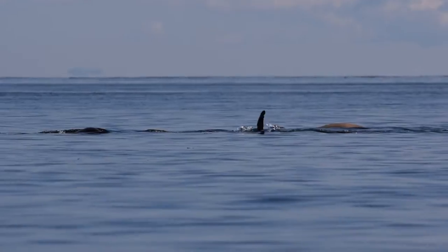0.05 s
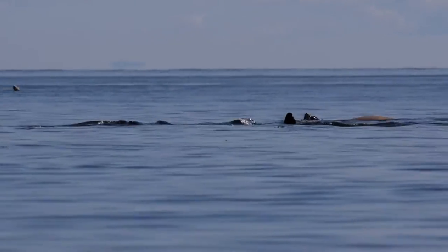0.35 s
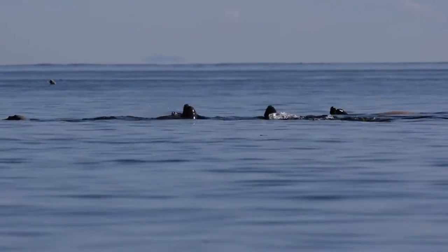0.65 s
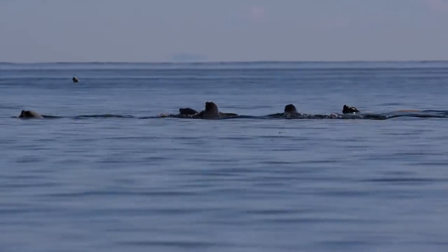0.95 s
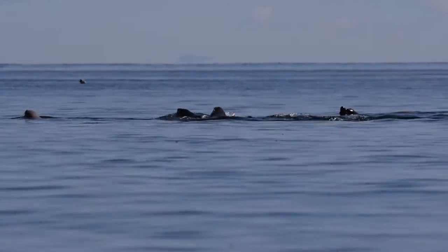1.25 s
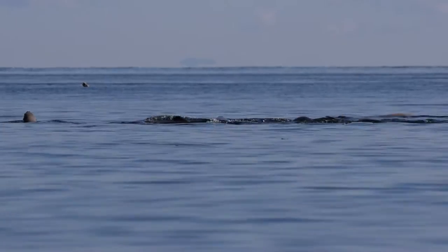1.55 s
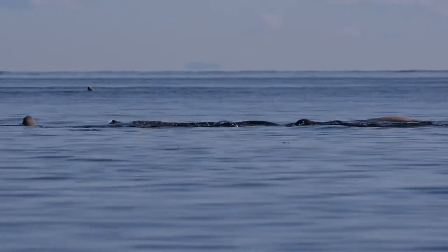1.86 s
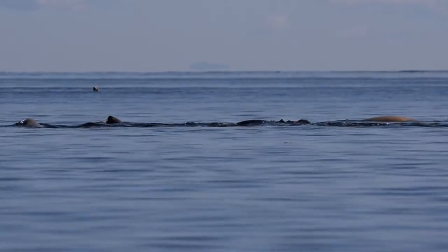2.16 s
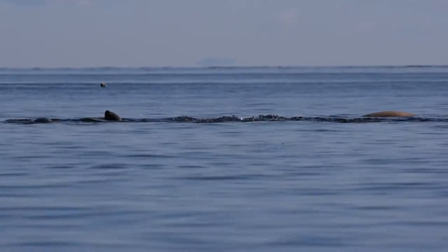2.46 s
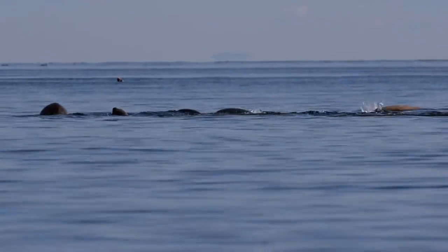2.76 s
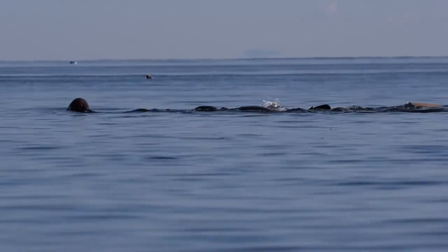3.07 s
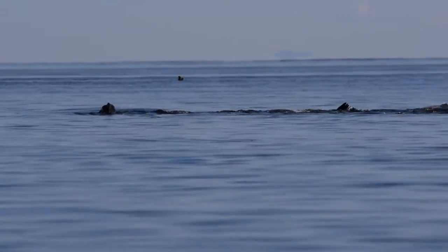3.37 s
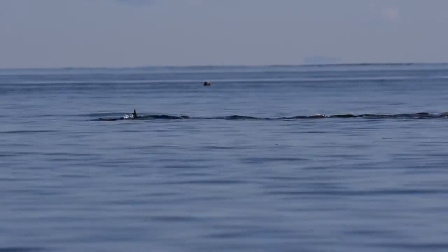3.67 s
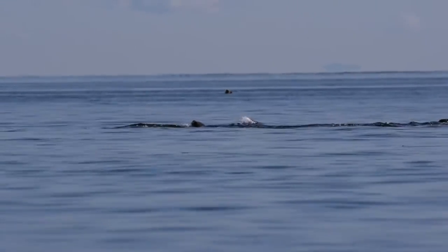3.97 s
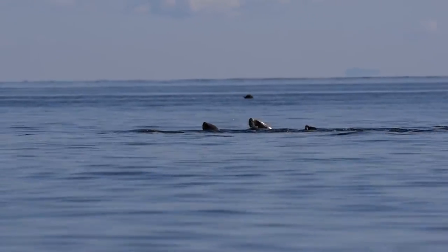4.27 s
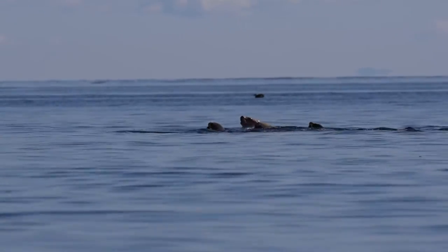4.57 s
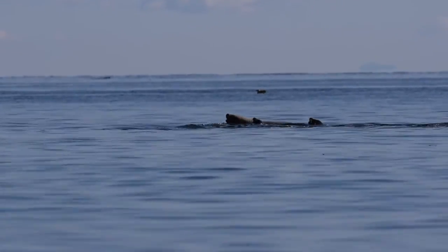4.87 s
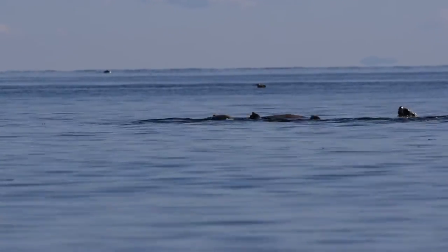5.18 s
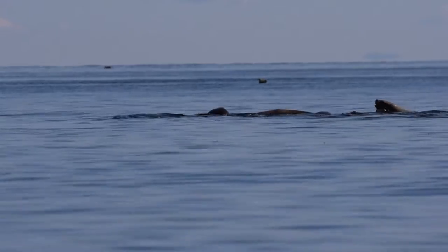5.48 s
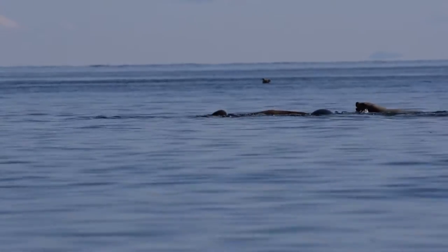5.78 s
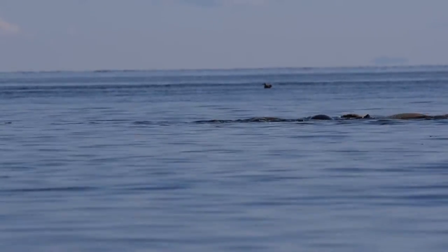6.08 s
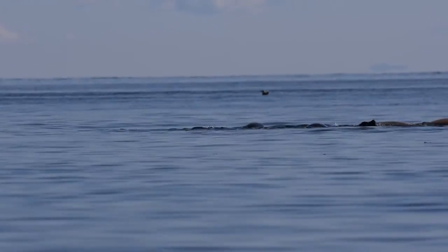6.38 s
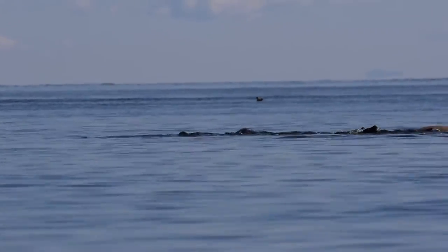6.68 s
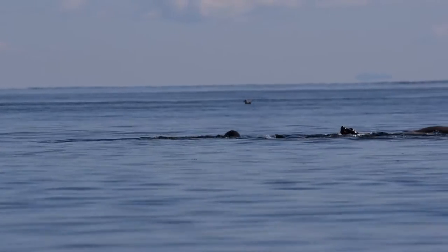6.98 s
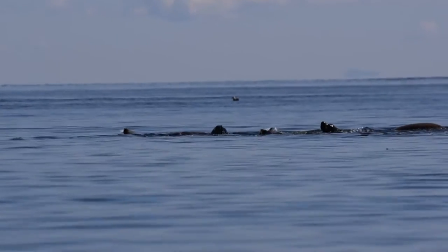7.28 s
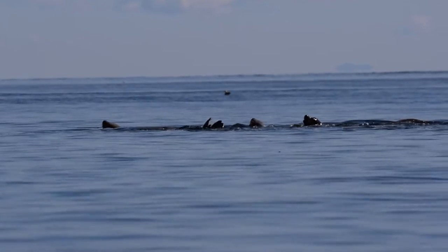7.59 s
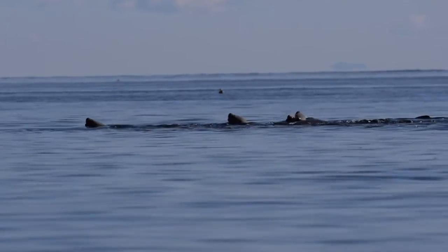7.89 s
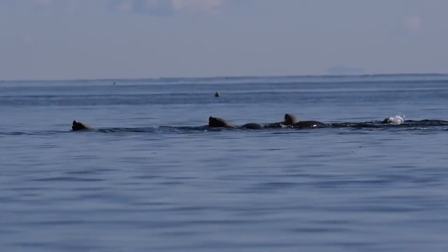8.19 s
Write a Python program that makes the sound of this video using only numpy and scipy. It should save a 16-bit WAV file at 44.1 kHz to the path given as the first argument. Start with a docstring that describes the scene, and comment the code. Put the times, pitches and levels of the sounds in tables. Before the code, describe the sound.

Calm sea water gurgles, drips and fizzes around a boat as two small waves pass, with soft wind underneath.

```python
"""A small wave washes past a boat on a calm sea, where sea lions surface and roll.
Its rush is countless ringing air bubbles (big ones low, small ones high) and a fizz of fine spray.
The water laps, plops and drips until a second wave passes on the right, about six seconds in.
A light breeze and a very faint motor hum lie underneath. The water's gurgle and wash sound centred,
while the spray and the breeze's deep rumble sound wider."""
import sys
import numpy as np
from scipy import signal
from scipy.fft import rfft, irfft, next_fast_len
from scipy.io import wavfile
from scipy.ndimage import uniform_filter1d, map_coordinates

SR = 44100
rng = np.random.default_rng(int(sys.argv[2]) if len(sys.argv) > 2 else 0)


def unload_audio(sound):
    """Save the sound as a 16-bit wav file, at the path given as the first command line argument."""
    columns = np.transpose(np.atleast_2d(sound))
    # keep every value between -1 and 1, then stretch to whole-number steps
    steps = np.round(np.clip(columns, -1, 1) * 32767)
    wavfile.write(sys.argv[1], SR, steps.astype(np.int16))


N = 363384

# The tone colour of the breeze. Each row: frequency in Hz, relative level in dB.
AIR_SPECTRUM = [(15, -7), (35, -3.5), (60, -6), (110, -6), (170, -2), (270, -0.5), (370, -1.5), (600, 7),
                (2000, -23), (9000, -18.5), (15500, -28.5)]
# How wide it sounds. Each row: frequency in Hz, width in dB (very negative means both sides alike).
AIR_WIDTH = [(25, -2), (60, -3), (125, -11), (300, -20.5), (1200, -20), (2500, 0), (4500, 0), (12000, -3)]
# The motor's main tone. Each row: time in seconds, pitch in Hz, level in dB.
MOTOR_TONE = [(0, 77, -75.5), (2.3, 76, -75.5), (3.3, 78.8, -77), (4.25, 85.5, -75), (5.4, 88, -71.5),
              (6.9, 86.4, -77), (8.24, 89.4, -72.5)]
# Its steady higher tones. Each row: pitch in Hz, level in dB.
MOTOR_OVERTONES = [(125, -78), (189, -76), (285, -78)]

# Clear drops close by. Each row: start in seconds, peak in dB, pitch in Hz, fading time in cycles.
NEAR_DROPS = [(0.0118, -33, 7200, 1.5), (0.0309, -23.5, 2230, 1.6), (0.1033, -41, 5570, 3),
              (0.2375, -33, 4020, 1.9), (0.246, -25.5, 1020, 1.4), (0.3477, -27, 2530, 3.9),
              (0.4612, -27, 1480, 1.8), (0.4774, -33, 4600, 1.4), (0.524, -34, 710, 3),
              (0.528, -43, 6150, 2.5), (0.6106, -41, 6080, 2.5), (0.657, -32, 2340, 2.3),
              (0.801, -36, 2450, 2.5), (0.8684, -36, 8800, 1), (0.886, -34, 2350, 2.7),
              (1.3802, -38, 870, 1.3), (1.495, -39, 2410, 3), (1.6205, -49, 6740, 2.5),
              (1.693, -36, 1020, 2.2), (1.7595, -37, 2330, 3), (1.7685, -33.5, 3680, 4.2),
              (1.785, -39.5, 690, 3.5), (1.834, -40.5, 4130, 4), (1.9173, -35.5, 2500, 4.1),
              (2.032, -36, 2420, 2.7), (2.0894, -40, 5370, 3), (2.114, -37, 3700, 3),
              (2.1145, -33, 2380, 2), (2.1214, -31, 8500, 1), (2.2666, -32, 1510, 2),
              (2.2753, -35, 1450, 2), (2.315, -44, 2890, 17), (2.367, -37, 2400, 2),
              (2.4664, -33, 1500, 1.2), (2.4662, -28, 3030, 3.2), (2.4664, -36, 5200, 4),
              (2.4672, -28.5, 3760, 2.8), (2.5665, -43, 4200, 3), (2.624, -44, 8630, 4),
              (2.689, -39, 4560, 2.3), (2.808, -48, 3600, 7.3), (2.848, -50, 2950, 9),
              (2.8805, -47, 5860, 3), (3.0487, -51, 6480, 2.5), (3.3265, -44, 2550, 2.5),
              (3.3603, -48, 6470, 3), (3.4896, -29, 1430, 2.3), (3.501, -40, 1400, 1.9),
              (3.615, -40, 1420, 2.5), (3.7596, -33.5, 1800, 2), (3.774, -36.5, 1485, 2.5),
              (3.9752, -44, 4250, 5.6), (4.068, -37, 1170, 1.6), (4.0942, -31, 1190, 4.1),
              (4.1245, -40, 1345, 3), (4.2365, -42, 2990, 3.5), (4.262, -41, 2920, 4),
              (4.493, -34, 1450, 2.6), (4.669, -45, 7290, 2), (4.711, -31, 1270, 2),
              (4.8168, -33, 1380, 4.5), (4.8447, -28.5, 1730, 2.4), (4.8698, -29, 1400, 2.7),
              (4.9815, -46, 8250, 2), (5.0445, -35.5, 1510, 2.6), (5.0563, -31, 1270, 3.3),
              (5.0671, -37, 8800, 1), (5.103, -36.5, 1460, 3.7), (5.293, -42, 5740, 2),
              (5.528, -39, 3100, 3.7), (5.608, -37, 6490, 2), (5.682, -28.5, 2000, 2.4),
              (5.715, -35, 5890, 2), (5.811, -32, 2390, 2.1), (5.9026, -33, 4480, 2.5),
              (5.9126, -38, 6700, 2.2), (6.028, -33, 1000, 2.5), (6.085, -25, 1590, 2.6),
              (6.114, -34, 9900, 3), (6.165, -35, 7550, 2), (6.236, -28, 1400, 1.8),
              (6.26, -27.5, 1240, 1.6), (6.286, -29, 1300, 1.8), (6.3248, -32, 1250, 2.1),
              (6.3084, -34, 4430, 3), (6.338, -24, 2120, 5.1), (6.353, -32, 4600, 2.5),
              (6.5283, -29.5, 3970, 2), (6.631, -29, 1180, 2.3), (6.723, -25, 9700, 4.2),
              (6.7226, -26, 7000, 2.3), (6.752, -28, 2410, 2), (6.7625, -27, 1420, 2.4),
              (6.7738, -33, 8980, 1.6), (6.8008, -30, 3200, 3.1), (6.882, -29.5, 1224, 6.6),
              (7.0621, -32, 2760, 2.5), (7.2445, -31.5, 2450, 2.9), (7.2964, -40, 5800, 2),
              (7.433, -36, 4030, 2), (7.4538, -43, 5970, 2), (7.6804, -38.5, 4260, 4),
              (7.726, -35, 2650, 5.7), (7.963, -35, 2850, 2.3), (7.9893, -38.5, 3300, 4.4),
              (8, -37, 1020, 2.8), (8.02, -36.5, 1410, 2.5), (8.1644, -37, 1410, 2.3),
              (8.168, -37.5, 1030, 3.3), (8.1805, -35.5, 3080, 2.8), (8.1823, -39.5, 4250, 2.5)]
# Droplets falling back after a splash. Each row: middle in seconds, half-length in seconds, level in dB.
SHOWERS = [(.11, .025, -50.5), (.225, 0.021, -51), (2.04, 0.018, -53.5), (2.108, 0.017, -52),
           (5.92, 0.017, -48), (5.995, 0.015, -49), (6.365, 0.027, -46.5), (6.548, 0.023, -49),
           (6.656, 0.011, -51), (6.765, 0.028, -52), (7.432, 0.02, -54)]
# Spray slapped up in short spurts. Each row: middle in seconds, half-length in seconds, level in dB.
SPURTS = [(0.016, 0.015, -53), (0.1, .0015, -58), (0.146, .003, -50), (0.224, 0.002, -50),
          (0.659, 0.0015, -41), (2.1215, 0.0013, -38), (5.066, 0.002, -53), (5.91, 0.013, -50),
          (6.348, 0.024, -48), (6.724, 0.001, -40), (6.738, .002, -48), (6.774, 0.0012, -45),
          (6.805, 0.007, -52), (7.436, 0.0015, -48)]
# The tone colours of showers and spray. Each row: frequency in Hz, relative level in dB.
SHOWER_SPECTRUM = [(3100, -19), (3900, 5), (5800, -5), (8000, -4)]
SPRAY_SPECTRUM = [(1200, -16), (2300, 5), (3200, 2.5), (4100, 1.5), (5200, -0.5), (6300, -1.5), (7200, -4),
                  (8800, -4.5), (9900, -6.5), (11500, -9.5), (15500, -23)]
# How wide both sound. Each row: frequency in Hz, width in dB.
SPRAY_WIDTH = [(2000, -42), (2800, -18), (3500, -7.5), (5000, -9.5), (8000, -4.5), (12000, -0.5)]
# Spray on the right reaches the microphone's left port (opening) later.
# Each row: time in seconds, delay in samples.
SPRAY_LAG = [(.3, .45), (1, .2), (4.5, .2), (5.9, 1.1), (6.8, 1.15), (7.2, .5), (8.24, .55)]

# Swirls in rolling water. Each row: middle in seconds, half-length in seconds, level in dB, pitch in Hz.
SWIRLS = [(0.18, 0.14, -41, 1670), (0.183, 0.066, -63, 194), (0.256, 0.026, -45, 960),
          (0.422, 0.014, -45, 473), (0.465, 0.033, -39, 1360), (.645, 0.014, -53, 430),
          (1.28, .008, -51, 320), (1.372, 0.015, -45, 880), (1.354, .025, -44, 1380),
          (1.635, 0.026, -50.5, 530), (1.786, 0.017, -49, 670), (2.033, 0.008, -41, 1750),
          (2.088, .012, -45.5, 570), (3.033, 0.0092, -47, 780), (3.093, 0.0059, -48, 620),
          (3.154, 0.0097, -48, 880), (3.475, 0.0074, -45, 1000), (3.495, 0.015, -46, 1400),
          (4.058, 0.011, -45, 563), (4.096, 0.006, -47.5, 570), (4.087, 0.012, -51, 950),
          (4.717, 0.026, -45.5, 1290), (4.85, 0.011, -44, 1530), (5.065, 0.007, -45.5, 950),
          (5.938, .012, -42.5, 517), (6.253, 0.21, -42, 1140), (6.394, 0.079, -56, 347),
          (6.614, 0.09, -45, 1010), (6.76, .04, -55, 340), (7.408, 0.042, -45, 665),
          (7.517, 0.021, -59, 185), (7.709, 0.004, -43, 342), (7.713, 0.0054, -45, 468),
          (7.77, 0.078, -47.5, 590), (7.79, .06, -56.5, 392), (7.78, 0.035, -46, 1100)]
# Two waves with a smaller swell between. Each row: time in seconds, wash level in dB, spray level in dB.
WAVE_LEVELS = [(0, -39.5, -50.5), (.25, -40, -49.5), (.46, -40.5, -50), (.75, -45, -54), (1.1, -44.5, -55),
               (1.4, -43.5, -56.5), (1.7, -47.5, -55.5), (2.07, -43.5, -55.5), (2.35, -47.5, -56),
               (2.85, -51, -58), (4.2, -50, -60), (4.75, -46, -57), (5.5, -45.5, -53), (5.65, -44.5, -48.5),
               (5.92, -40.3, -47), (6.35, -38.5, -46), (6.78, -38.5, -44), (7, -41.5, -50),
               (7.4, -42.5, -49), (7.65, -44, -55), (8.24, -47.5, -56)]
# Low gurgling, strongest around each wave. Each row: time in seconds, level in dB.
GURGLE_LEVELS = [(0, -46), (.5, -46), (.75, -54), (1.3, -52.5), (2.1, -55.5), (2.8, -57.5), (3.7, -57),
                 (4.7, -54.5), (5.6, -53.5), (5.95, -47.5), (6.5, -46), (7, -49.5), (7.7, -49),
                 (8.24, -54.5)]
# Water lapping in a hollow. Each row: time in seconds, level in dB.
LAP_LEVELS = [(.5, -47), (1.3, -55.5), (2.9, -60), (3.4, -52.5), (3.8, -54.5), (4.2, -54.5), (4.7, -51.5),
              (5.5, -49), (6.1, -52), (7.1, -66)]
# The tone colours of gurgle, wash and hollow. Each row: frequency in Hz, relative level in dB.
GURGLE_SPECTRUM = [(100, -47), (180, -19), (260, -9.5), (370, -12), (480, -3), (650, 0.5), (850, -3),
                   (1050, -2), (1300, -5), (2500, -57)]
WASH_SPECTRUM = [(400, -23), (750, -1.5), (1000, -3.5), (1200, -1), (1420, -1.5), (1700, -2), (2050, -3),
                 (2600, -7.5), (2850, -9), (3300, -16), (3900, -19), (4500, -23), (8000, -65)]
HOLLOW_SPECTRUM = [(700, -44), (1100, -20), (1300, -8), (1410, -2), (1560, -6), (1850, -15), (3000, -52)]
# How wide these three sound. Each row: frequency in Hz, width in dB.
WATER_WIDTH = [(300, -32), (700, -28), (1250, -35), (2000, -31), (2800, -18.5), (4000, -9)]
# How the two ports differ in treble. Each row: frequency in Hz, left level minus right level in dB.
PORT_BALANCE = [(1000, 0), (2000, -.4), (4000, -1.1), (8000, -2.1), (12000, -1.6)]

DRIP_OVER_SPRAY_DB, DRIP_SCATTER_DB, DRIP_FALL_DB_PER_OCTAVE = 7.5, 2, 0.5
DRIP_LOW_HZ, DRIP_OCTAVES, DRIP_LIFE_CYCLES = 3800, 1.4, 2.2
HISS_ABOVE_HZ, HISS_GAIN_DB, HISS_FLUTTER_DB = 6040, -3.5, 0.4
HOLLOW_DRIFT, HOLLOW_DRIFT_PER_S = .025, 5  # how far the pitch wanders (as a share of it), how often
FAR_RUSH = 2.3  # how many times stronger distant water is than the near bubbles
TOP_HZ, ZERO_OFFSET = 15700, -.0029


def amp(db):
    """Turn decibels into a number to multiply by."""
    return 10 ** (np.asarray(db) / 20)


def unit(x):
    """Scale a signal to an average strength (rms) of 1."""
    return x / np.sqrt(np.mean(x ** 2) + 1e-20)


def along(points, hz):
    """Read a table at any frequency, giving each octave about equal room."""
    freqs, values = np.transpose(points)
    return np.interp(np.log(hz + 1), np.log(freqs + 1), values)


def curves(rows):
    """Join a table's rows with straight lines: one curve for each column after the time."""
    times, *columns = np.transpose(rows)
    return [np.interp(np.arange(N) / SR, times, column) for column in columns]


def wobble(rate):
    """A smooth curve through `rate` random points a second."""
    return map_coordinates(rng.standard_normal(int(N * rate / SR) + 4), [np.arange(N) * rate / SR])


def swell(rate, depth_db):
    """A volume that drifts at random."""
    return amp(depth_db * wobble(rate))


def bump(middle, half_length):
    """A bell-shaped rise and fall, timed in seconds."""
    return np.exp(-.5 * ((np.arange(N) / SR - middle) / half_length) ** 2)


def filtered(x, response):
    """Turn each frequency up or down by the gain that `response` gives it."""
    size = next_fast_len(N + SR // 2)
    return irfft(rfft(x, size) * response(np.fft.rfftfreq(size, 1 / SR)), size)[..., :N]


def at_ports(pair, spectrum, width):
    """Colour two unrelated signals: one is what left and right share, the other is how they differ."""
    def response(hz):
        angle = np.arctan(amp(along(width, hz)))
        return amp(along(spectrum, hz)) * [np.cos(angle), np.sin(angle)]
    mid, side = filtered(pair, response)
    return unit(np.array([mid + side, mid - side]))


def from_the_right(pair, lag):
    """Make the left side late and the right side early, each by half the lag."""
    left = map_coordinates(pair[0], [np.arange(N) - lag / 2], order=5)
    right = map_coordinates(pair[1], [np.arange(N) + lag / 2], order=5)
    return np.array([left, right])


def patchy_noise(depth_db):
    """Two noises whose strength drifts in patches of time and pitch."""
    spectra = signal.stft(rng.standard_normal((2, N)), nperseg=512)[2]
    patches = uniform_filter1d(rng.standard_normal(spectra.shape[1:]), size=6, axis=0)
    patches = uniform_filter1d(patches, size=10, axis=1)
    noise = signal.istft(spectra * amp(depth_db * unit(patches)), nperseg=512)[1]
    return unit(noise[:, :N])


def bubble(cycles, life, rise):
    """A bubble rings up fast and fades over `life` cycles, rising in pitch as it nears the surface."""
    age = np.maximum(cycles, 0) / life
    return np.sqrt(2 * age) * np.exp(.5 - age) * np.sin(2 * np.pi * cycles * (1 + rise * age))


def bubbles(count, low_hz, high_hz, life, spread_db, samples):
    """A swarm of bubbles, random in moment, pitch and strength, shared between two unrelated signals."""
    when, pitch, strength, damping, bearing = rng.random((count, 5)).T[:, :, None]
    hz = low_hz * (high_hz / low_hz) ** pitch
    gain = amp(-spread_db * np.log(strength + .01)) * hz / high_hz
    lives = life * 2 ** (2 * damping - 1)
    rings = gain * bubble(hz * np.arange(samples) / SR, lives, rise=0.019)
    places = ((when * N).astype(int) + np.arange(samples)).ravel()
    shares = np.cos(2 * np.pi * bearing), np.sin(2 * np.pi * bearing)
    return np.array([unit(np.bincount(places, (rings * share).ravel(), N)[:N]) for share in shares])


def breeze():
    """Light air over open water makes a soft, even noise."""
    return amp(-59) * at_ports(rng.standard_normal((2, N)), AIR_SPECTRUM, AIR_WIDTH)


def motor():
    """A motor hums faintly: its main tone creeps upward while the higher ones only waver."""
    def tone(hz):
        return np.sqrt(2) * np.sin(2 * np.pi * np.cumsum(hz + .9 * wobble(6)) / SR)
    pitch, level_db = curves(MOTOR_TONE)
    overtones = sum(amp(db) * swell(rate=1.9, depth_db=1) * tone(hz) for hz, db in MOTOR_OVERTONES)
    return amp(level_db) * swell(rate=7, depth_db=1.5) * tone(pitch) + overtones


def drips(count):
    """Faint random drops, stronger when more spray flies, listed like the rows of NEAR_DROPS."""
    when, pitch, strength = rng.random((count, 3)).T
    _, spray_db = curves(WAVE_LEVELS)
    octaves = DRIP_OCTAVES * pitch
    hz = np.minimum(DRIP_LOW_HZ * 2 ** octaves, TOP_HZ)
    db = spray_db[(when * N).astype(int)] + DRIP_OVER_SPRAY_DB - DRIP_FALL_DB_PER_OCTAVE * octaves
    db += DRIP_SCATTER_DB * (2 * strength - 1)
    return list(zip(when * N / SR, db, hz, np.full(count, DRIP_LIFE_CYCLES)))


def drops():
    """Each drop slaps the surface and traps a short-lived bubble; the boat's side echoes it."""
    out, t = np.zeros((2, N + SR)), np.arange(SR // 20) / SR
    for start, db, hz, life in NEAR_DROPS + drips(count=70):
        lead = rng.normal(0, 4e-6)  # seconds early at one port and late at the other
        port_time = t + np.array([[lead], [-lead]])
        ring = bubble(hz * port_time, life, rise=0.00097)
        echo = bubble(hz * (port_time - rng.uniform(.003, .006)), life, rise=.008)
        band = signal.butter(2, [hz / 2, min(hz * 1.74, SR * .45)], "bandpass", fs=SR)
        slap = unit(signal.lfilter(*band, rng.standard_normal(len(t)))) * np.exp(-t * hz / (3 * life))
        first = round(start * SR)
        out[:, first:first + len(t)] += amp(db) * (ring + .13 * echo + .13 * slap)
    return out[:, :N]


def showers():
    """Water thrown up by a splash patters back as a short, dense shower of droplets."""
    strength = sum(amp(db) * bump(middle, half_length) for middle, half_length, db in SHOWERS)
    droplets = bubbles(count=9000, low_hz=3000, high_hz=8000, life=2.6, spread_db=2.2, samples=300)
    return strength * at_ports(droplets, SHOWER_SPECTRUM, SPRAY_WIDTH)


def spray():
    """Droplets patter back in little clusters, over a fizz of bursting foam."""
    _, level_db = curves(WAVE_LEVELS)
    spurts = sum(amp(db) * bump(middle, half_length) for middle, half_length, db in SPURTS)
    crackle = bubbles(count=18000, low_hz=2500, high_hz=14000, life=1.6, spread_db=3.2, samples=160)
    clusters = .75 * swell(rate=55, depth_db=2.6)
    fizz = at_ports(clusters * crackle + patchy_noise(depth_db=2), SPRAY_SPECTRUM, SPRAY_WIDTH)
    # The highest hiss of the spray is softer and flutters slightly in level.
    hiss = filtered(fizz, lambda hz: hz ** 4 / (hz ** 4 + HISS_ABOVE_HZ ** 4))
    hiss_gain = amp(HISS_GAIN_DB) * swell(rate=28, depth_db=HISS_FLUTTER_DB)
    return (amp(level_db) + spurts) * (fizz + (hiss_gain - 1) * hiss)


def swirls():
    """Pockets of air pulled under gulp briefly, each near a pitch set by its size."""
    out = np.zeros(N)
    for middle, half_length, db, hz in SWIRLS:
        band = signal.butter(2, [hz * 0.893, hz * 1.3], "bandpass", fs=SR, output="sos")
        gulp = unit(signal.sosfilt(band, rng.standard_normal(N)))
        out += amp(db) * bump(middle, half_length) * gulp
    return out


def sloshing(pair):
    """The hollow fills and drains, so its ring glides a little up and down."""
    position = np.cumsum(1 + HOLLOW_DRIFT * wobble(HOLLOW_DRIFT_PER_S))
    return np.array([map_coordinates(port, [position], mode="mirror") for port in pair])


def waves():
    """Big bubbles gurgle, middling ones wash, far ones blur into a rush, and some ring in a hollow."""
    wash_db, _ = curves(WAVE_LEVELS)
    lap_db, = curves(LAP_LEVELS)
    gurgle_db, = curves(GURGLE_LEVELS)
    big = bubbles(count=3400, low_hz=250, high_hz=1100, life=1.4, spread_db=1.2, samples=1400)
    middling = bubbles(count=9000, low_hz=800, high_hz=4500, life=1.9, spread_db=1.9, samples=500)
    in_hollow = bubbles(count=5000, low_hz=1200, high_hz=1700, life=2.6, spread_db=1.1, samples=800)
    gurgle = at_ports(big + FAR_RUSH * patchy_noise(depth_db=1), GURGLE_SPECTRUM, WATER_WIDTH)
    wash = at_ports(middling + FAR_RUSH * patchy_noise(depth_db=1), WASH_SPECTRUM, WATER_WIDTH)
    lap = swell(rate=9, depth_db=2) * sloshing(at_ports(in_hollow, HOLLOW_SPECTRUM, WATER_WIDTH))
    water = amp(gurgle_db) * gurgle + amp(wash_db) * wash + amp(lap_db) * lap
    return swell(rate=13, depth_db=0.5) * water


def scene():
    """Water all round the boat, splashing a little to the right, over the motor and the breeze."""
    lag, = curves(SPRAY_LAG)
    water = waves() + swirls()
    splashes = from_the_right(spray() + showers() + drops(), lag)
    return water + splashes + motor() + breeze()


def record(dry):
    """The right port is a little brighter, the highest treble is cut, and the signal rests off zero."""
    def response(hz):
        return amp(along(PORT_BALANCE, hz) * np.array([[.5], [-.5]])) * (hz < TOP_HZ)
    return ZERO_OFFSET + filtered(dry, response)


dry = scene()
out = record(dry)
unload_audio(out)
```